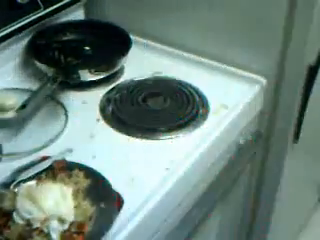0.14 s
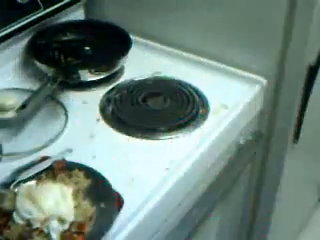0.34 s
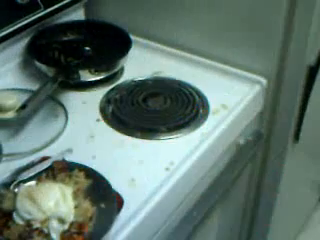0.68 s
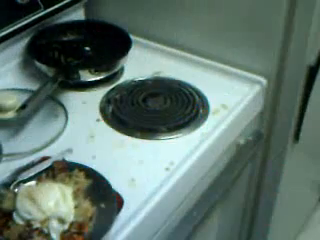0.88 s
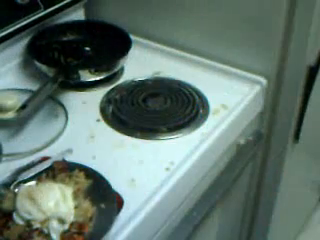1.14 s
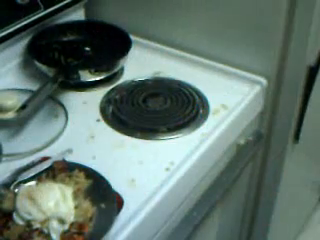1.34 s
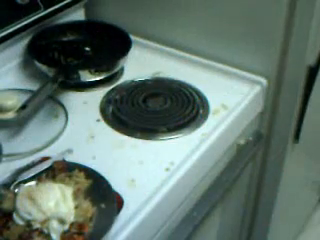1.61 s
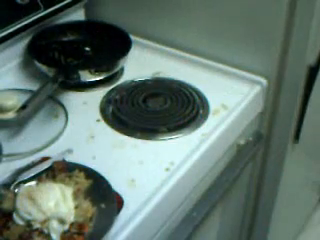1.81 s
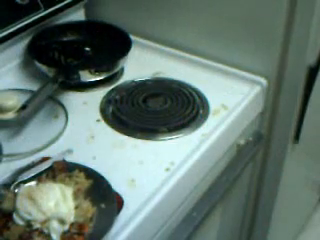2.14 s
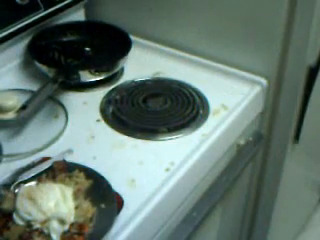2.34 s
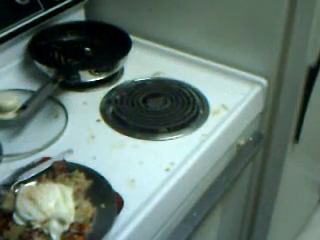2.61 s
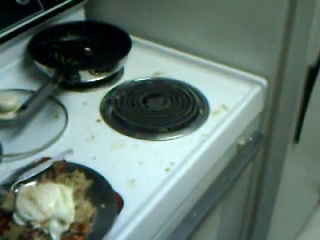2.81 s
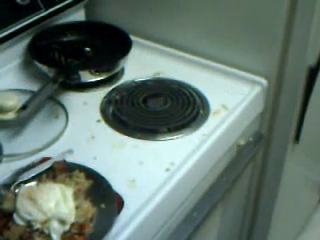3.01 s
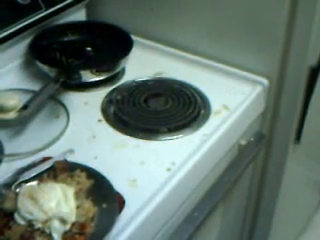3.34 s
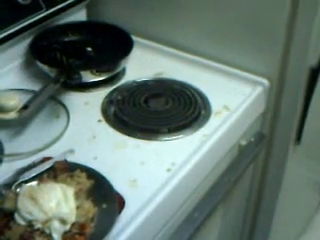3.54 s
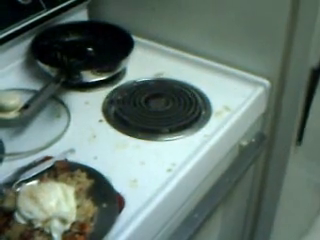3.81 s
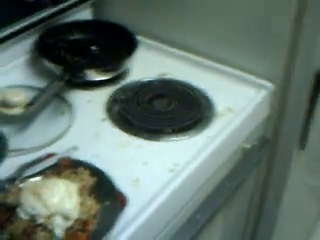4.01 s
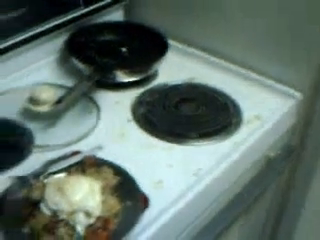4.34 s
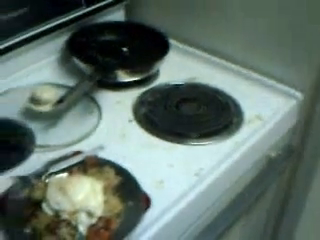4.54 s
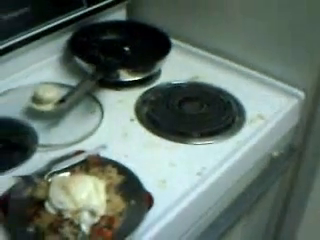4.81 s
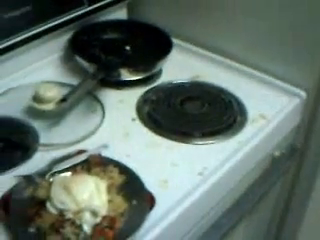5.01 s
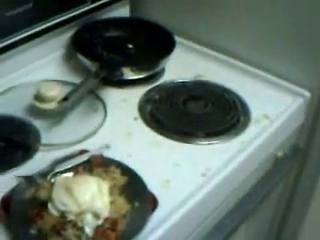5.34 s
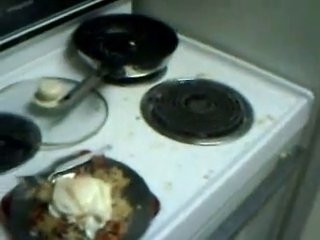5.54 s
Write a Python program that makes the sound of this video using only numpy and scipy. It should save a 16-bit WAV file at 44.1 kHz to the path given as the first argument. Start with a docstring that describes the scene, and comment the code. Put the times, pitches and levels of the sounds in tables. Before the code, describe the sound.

A steady low electric hum, slightly wavering, continues throughout over a dull, rumbling room wash with a thin, watery hiss from poor compression. A faint bump comes at about 0.3 seconds, then at 0.55 to 0.85 a utensil slides briefly with soft knocks and a thin metallic ring. At about 1.4 seconds a pan lands hard on the sheet-metal stove, by far the loudest event, slightly overloading the microphone; it bounces and rattles, with another knock near 1.57, settling by 1.8. The hum then sings out more strongly. From 1.9 to 3.4 there are only faint taps and rustles. A soft knock at 4.1 leads to a sharper clink at 4.2, small rattles, and another crisp knock at 4.55. Light taps follow, with a small knock near 4.87 and a last faint tap at 5.5. The kitchen is small and dry, with short reflections and dull treble.

```python
"""A steady electric hum in a small kitchen, over the wash of the room.
Someone slides a utensil, sets a pan down on the sheet-metal stove so that it bounces,
and knocks it twice more; faint taps lie between. Noisy contacts ring decaying metal modes, shaped
noise makes the slide and the wash, wavering sines make the hum, and a short tail adds the room.
Low-bitrate coding colours it: a top band follows each contact, and streaks thin the wash."""
import sys
import numpy as np
from scipy import signal
from scipy.io import wavfile
from scipy.ndimage import uniform_filter1d

SR = 44100
rng = np.random.default_rng(int(sys.argv[2]) if len(sys.argv) > 2 else 0)


def transcribe(u):
    """Save the signal u as a 16-bit wav file named by the first command-line argument.

    u: samples, shape (n,) or (channels, n), limited to [-1, 1]; the rate is SR.
    q: integer samples, one column per channel.
    """
    v = np.clip(np.atleast_2d(u).T, -1, 1)
    q = np.round(v * 32767).astype(np.int16)
    wavfile.write(sys.argv[1], SR, q)


N = 250481


def gain_of(db):
    """Amplitude factor of a level in dB."""
    return 10 ** (np.asarray(db) / 20)


def evened(x):
    """Scale to an rms of 1."""
    return x / np.sqrt(np.mean(x ** 2) + 1e-20)


def along(rows, t):
    """Straight-line curves through the rows, whose first column is time in seconds."""
    s, *columns = np.transpose(rows)
    return [np.interp(t, s, column) for column in columns]


def wander(t, slow_hz, fast_hz):
    """Random drift of rms 1: 24 sines of random phase, weaker towards the faster ones."""
    rates = np.geomspace(slow_hz, fast_hz, 24)
    return evened(sum(np.sin(2 * np.pi * (f * t + rng.random())) / np.sqrt(f) for f in rates))


def band(x, lo_hz, hi_hz):
    """Band-pass filter."""
    return signal.sosfilt(signal.butter(2, [lo_hz, hi_hz], "band", fs=SR, output="sos"), x)


def add(mix, s, sound):
    """Lay a sound into the mix at a time in seconds."""
    part = mix[round(s * SR):][:len(sound)]
    part += sound[:len(part)]


def registers(t, ring_tilt_db, scrape_tilt_db):
    """Decaying sines in six groups, low to high: five of stove and pan modes, then the coded top band."""
    # What stove and pan ring with below 6.2 kHz, and above it the coded top band that follows
    # each contact. Each row: frequency in Hz, relative level in dB before tilt and contact point,
    # t60 in seconds.
    contact_modes = [(93, -7, 0.11), (109, 1, 0.06), (170, -26, 0.073), (268, -15, 0.088),
                     (309.4, 17, 0.039), (378.6, -16, 0.21), (446.5, 8.5, 0.033), (535, -1, 0.065),
                     (657, 1, 0.057), (736, 6, 0.029), (839, 5, 0.057), (912, -0.5, 0.05),
                     (968, 3.5, 0.023), (1088, -2, 0.025), (1151, -6, 0.035), (1291, 1.5, 0.027),
                     (1350, -18, 0.043), (1502, -6, 0.054), (1665, -12.5, 0.041), (1835, -6, 0.094),
                     (2020, -19, 0.02), (2113, -2.5, 0.015), (2360, -3, .022), (2630, 2, 0.015),
                     (2858, -2, 0.022), (3005, -2.5, 0.025), (3305, -3, .025), (3416, -2.5, 0.0098),
                     (3715, -1, 0.013), (3917, -3, .025), (4270, 1, .008), (4460, -5, 0.0064),
                     (4950, -3.5, 0.011), (5520, -1, 0.014), (6100, -8.5, 0.0092), (6540, -2.5, 0.02),
                     (6830, -8, 0.02), (7020, -12, 0.0075)]
    hz, db, t60 = np.transpose(contact_modes)
    group = np.searchsorted([200, 420, 2050, 4100, 6200], hz)
    modes = gain_of(-60 * t / t60[:, None]) * np.sin(2 * np.pi * hz[:, None] * t)
    # only groups 2 (ring) and 3 (crunch) are tilted, in dB per octave around 1 kHz
    tilt_db = np.where(group > 2, scrape_tilt_db, ring_tilt_db) * np.log2(hz / 1000)
    tilt_db *= (group > 1) & (group < 4)
    # each contact favours other modes
    place_db = 2.5 * np.array([0, .8, .6, 1.2, 1, 1])[group] * rng.standard_normal(tilt_db.shape)
    share = gain_of(db + tilt_db + place_db)
    return [share[:, group == k] @ modes[group == k] for k in range(6)]


def blows():
    """A strike and a grainy rattle drive the lower modes; scraping noise the upper ones and coded top."""
    # Pan and utensil striking the stove. Each row: start in seconds, level in dB of the body at its
    # loudest, then thud, box, crunch, fizz and coded top band in dB against that level, rise in
    # seconds, scrape length in seconds, tilt of the ring and tilt of the crunch in dB per octave.
    stove_blows = [(.267, -46, 11, -21, -35, -26, -22, 0.0055, 0.026, -4, -5),
                   (.554, -35.5, -2, -5, -13, -37, -24, 0.0051, .045, 5, -8),
                   (.599, -38, 11, -10, -20, -30, -30, 0.0037, 0.027, -5, .1),
                   (.634, -38, 9, 0, -22, -33, -25, .004, 0.02, 1, -2),
                   (.657, -37, 7.5, 1, -21, -30, -25, 0.0035, .03, -1, 4),
                   (1.384, -11.5, -1.5, -22.5, -21, -42, -33, 0.0015, 0.0094, -5, -3),
                   (1.394, -10, 2.5, -1.5, -15, -43.5, -33, 0.00068, 0.03, 3.5, 4.5),
                   (1.423, -22.5, -8.5, 3.5, -22, -27.5, -30.5, 0.0024, 0.038, -2.5, 5.5),
                   (1.439, -28, 11.5, -22.5, -28, -32.5, -32, 0.0043, 0.029, -2.5, 1),
                   (1.461, -26, 3, -4.5, -14.5, -37, -33, 0.0063, 0.028, 0.5, -1),
                   (1.5, -31.5, 2, 1, -25, -30, -34, 0.005, 0.036, -6.5, 1),
                   (1.57, -17.5, -25, -7.5, -22, -37, -39.5, 0.0028, 0.02, -6.5, 8),
                   (1.581, -23, 3.5, -8, -21.5, -34, -36, 0.0023, 0.041, -2, 4),
                   (1.617, -31, -9.5, 1, -14, -40, -28.5, 0.0043, 0.068, -1.5, -1.5),
                   (1.674, -25, -0.5, -19, -17.5, -43, -35, 0.0032, 0.039, -3.5, 0),
                   (1.692, -33.5, 7.5, -10.5, -12, -32.5, -26, 0.0045, .022, 10, 1.5),
                   (1.739, -31, 7.5, -0.5, -18.5, -34, -31, 0.016, 0.05, -1.5, .1),
                   (4.082, -33, -14, 3, -21, -33, -42, 0.0093, 0.033, -1.5, -6),
                   (4.201, -43, -18, -11, 4, -10, -3.5, 0.0062, 0.02, 6, -0.5),
                   (4.214, -29, -10.5, -8, -4, 3, -2, 0.0058, 0.027, 4, 8),
                   (4.224, -14.5, -24, -.5, -5.5, -16.5, -13, 0.0021, 0.011, 5, 14),
                   (4.258, -33.5, -15, 9.5, -24.5, -29, -21, 0.0044, 0.051, 1, 2),
                   (4.304, -27, -9.5, -2.5, -30, -32, -32, 0.018, 0.029, 8, 1),
                   (4.33, -28.5, -20, 1, -13.5, -32, -29, 0.0031, 0.034, -3, 14),
                   (4.347, -36.5, -16.5, 7, -11, -27.5, -25, .005, 0.022, -7, 15),
                   (4.447, -32.5, -26, -8, -16.5, -37, -29, 0.01, 0.022, 2, -5),
                   (4.471, -33.5, -23, -7, -14, -37, -26, .004, 0.025, -4, 7),
                   (4.506, -49, -17, -7, -8, -8, -5, 0.004, 0.045, -1, .1),
                   (4.518, -40, -19, -3, -2.5, -3.5, -14, 0.0015, .008, 1.5, 15),
                   (4.537, -37, -21.5, -8, -11, -10, -9, .006, .016, 12, 6),
                   (4.551, -17, -43, -7.5, -12, -23, -28, 0.0018, 0.014, 12, -13),
                   (4.56, -19.5, -31, 5.5, -24.5, -16.5, -26, 0.0034, 0.018, -1, 1.5),
                   (4.582, -28, -9, -3.5, -11.5, -9.5, -20, 0.0017, 0.016, 7.5, -7),
                   (4.596, -33, -12, 9, -7, -16, -27, 0.0054, 0.018, -5.5, 3),
                   (4.612, -36, -2.5, -0.5, -9.5, -24, -24, 0.0056, 0.018, 3, -1),
                   (4.867, -29, -14, -2, -23.5, -41, -39, 0.0017, 0.01, 5, -5)]
    # Faint taps and rustles. Each row: start in seconds, level in dB of the body at its loudest,
    # crunch in dB against that level, scrape length in seconds.
    faint_taps = [(.398, -40, -11.5, 0.042), (.981, -42.5, -15, 0.025), (1.91, -39.5, -12, 0.063),
                  (1.939, -39.5, -17, 0.025), (2.099, -42, -15, 0.028), (2.159, -42.5, -12, 0.024),
                  (2.487, -38, -14.5, 0.027), (2.611, -41, -12, 0.04), (2.803, -40, -15.5, 0.046),
                  (2.892, -35.5, -20, 0.053), (2.971, -37, -26, 0.028), (2.994, -40.5, -13, 0.032),
                  (3.37, -46, -7.5, 0.05), (4.389, -35.5, -25, 0.025), (4.63, -44, -19.5, .03),
                  (4.712, -34, -24, 0.022), (4.732, -35, -20, 0.036), (4.746, -42.5, -10, 0.033),
                  (4.82, -41, -14, 0.047), (5.494, -38.5, -19, 0.035)]
    # shared by the taps: layers in dB against the body, rise in s, both tilts in dB per octave
    tap_thud_db, tap_box_db, tap_fizz_db, tap_coded_top_db = -10.5, -8, -40.5, -26.5
    tap_rise_s, tap_tilt_db = 0.0088, -0.5
    strike = 1.2  # first contact against the rattle, at a rise of strike_rise_s
    strike_rise_s = 0.0014  # a slower contact loses its first strike
    rattle_t60_s, scrape_t60_s = 0.079, 1
    grain_db = 3.2  # unevenness of the contact

    contacts = [*stove_blows]
    for at, db, crunch, length in faint_taps:
        contacts.append((at, db, tap_thud_db, tap_box_db, crunch, tap_fizz_db, tap_coded_top_db,
                         tap_rise_s, length, tap_tilt_db, tap_tilt_db))
    columns = np.transpose(contacts)[:, :, None]
    s, level_db, thud_db, box_db, crunch_db, fizz_db, coded_top_db, rise, scrape, *tilts = columns

    t = np.arange(7000) / SR
    start = 1 - np.exp(-(t / rise) ** 2)
    held = np.exp(-(t / scrape) ** 6)  # lasts while the faces touch, then stops
    rattle_noise, rub_noise, rough = rng.standard_normal((3, len(s), len(t)))
    grain = start * gain_of(grain_db * evened(uniform_filter1d(rough, 130)))

    push = t[None] * np.exp(-t / 0.0013)  # the whole weight lands once and moves the large panels
    rattle_level = grain * held * gain_of(-60 * t / rattle_t60_s)
    strike_level = strike * np.exp(-t / 0.0028) * (strike_rise_s / rise) ** 3
    rattle = rattle_noise * (rattle_level + strike_level)
    rub = rub_noise * np.sqrt(start * grain) * held * gain_of(-60 * t / scrape_t60_s)

    drives = [push, rattle, rattle, rub, rub, rub]
    thud, box, body, crunch, fizz, coded_top = (
        signal.fftconvolve(drive, ring, axes=1)[:, :len(t)]
        for drive, ring in zip(drives, registers(t, *tilts)))
    parts = [(thud_db, band(thud, 75, 320)),
             (box_db, box),
             (0, band(body, 326, 1900)),
             (crunch_db, band(band(crunch, 1800, 4100), 1800, 4100)),
             (fizz_db, band(band(fizz, 4000, 6700), 4000, 6700)),
             (coded_top_db, band(band(coded_top, 6120, 8470), 6120, 8470))]
    sounds = 0
    for db, part in parts:
        loudest = uniform_filter1d(part ** 2, 400).max(axis=1, keepdims=True)  # power over 9 ms
        sounds = sounds + gain_of(level_db + db) * part / np.sqrt(2 * loudest)
    out = np.zeros(N)
    for at, sound in zip(s[:, 0], sounds):
        add(out, at, sound)
    return out


def slide():
    """Rubbing noise shakes the panels and rings the utensil; returns the start in s and the sound."""
    # The course of the slide. Each row: time in seconds, then the levels of rumble, rubbing
    # and ringing in dB.
    slide_course = [(0.55, -43, -18, -61), (0.568, -50, -45, -65), (0.592, -46, -49, -59),
                    (0.616, -35, -43.5, -65), (0.664, -37, -35, -43), (0.726, -51, -46, -42),
                    (0.784, -44, -51.5, -62), (0.85, -48, -48, -75)]
    # What the utensil rings with. Each row: centre in Hz, width in Hz, relative level in dB.
    ring_bands = [(2290, 200, 0), (2950, 1300, -9), (3960, 170, -4), (4500, 1100, -10), (6900, 800, -7)]
    t = np.arange(slide_course[0][0], slide_course[-1][0], 1 / SR)
    rumble_db, rub_db, ring_db = along(slide_course, t)
    rumble_noise, rub_noise, ring_noise, rough = rng.standard_normal((4, len(t)))
    grain = gain_of(1.5 * evened(uniform_filter1d(rough, 300)))  # the contact catches and slips
    ring = sum(gain_of(db) * evened(band(ring_noise, hz - width / 2, hz + width / 2))
               for hz, width, db in ring_bands)
    rumble = gain_of(rumble_db) * evened(band(rumble_noise, 47, 107))
    rub = gain_of(rub_db) * evened(band(rub_noise, 325, 1020))
    ringing = gain_of(ring_db) * evened(ring) * grain
    return t[0], (rumble + rub + ringing) * signal.windows.tukey(len(t), .15)


def hum():
    """Partials of one steady fundamental, the sixth singing out, and a drifting tone beside them."""
    # Weaker partials. Each row: multiple of the fundamental, level in dB, wavering in dB
    # (rms; its sign only turns the random drift over).
    weaker_partials = [(1, -57, 6), (2, -60.5, 1.5), (5, -61.5, -5), (7, -58, 3)]
    # The sixth partial sings out once the pan has landed, and more so later.
    # Each row: time in seconds, level in dB.
    sixth_course = [(0, -49.5), (.5, -57.5), (1.35, -52), (1.6, -43), (2.9, -44), (3.3, -41), (5.68, -41)]
    # A wandering tone beside the fourth partial. Each row: time in seconds, frequency in Hz, level in dB.
    drifting_course = [(0, 233.8, -51.5), (2.28, 232.8, -50), (2.38, 237.6, -42), (2.52, 236.7, -46),
                       (2.62, 236.9, -49.5), (2.75, 238.3, -45.5), (2.87, 237.6, -46.5),
                       (2.95, 232.2, -49.5), (4.05, 233.6, -53.5), (4.2, 236, -51), (4.45, 231.3, -50.5),
                       (5.68, 233.3, -50.5)]
    hum_hz = 58.82  # fundamental
    octave_db = -9  # octave of the drifting tone, against the tone
    t = np.arange(N) / SR
    steady = np.zeros(N)
    for multiple, db, waver_db in [*weaker_partials, (6, *along(sixth_course, t), 0.33)]:
        level = gain_of(db + waver_db * wander(t, 0.585, 22))
        steady += level * np.sin(2 * np.pi * (round(multiple) * hum_hz * t + rng.random()))
    hz, db = along(drifting_course, t)
    turn = 2 * np.pi * np.cumsum(hz) / SR
    tone = np.sin(turn) + gain_of(octave_db) * np.sin(2 * turn)
    drifting = gain_of(db + 2.2 * wander(t, 0.591, 23)) * tone
    return np.sqrt(2) * (steady + drifting)  # the levels are rms


def kitchen(x):
    """Room reflections as decaying noise: a short diffuse tail, duller than the direct sound."""
    t = np.arange(SR // 2) / SR
    tail = rng.standard_normal(len(t)) * gain_of(-60 * t / 0.21) * (t > .006)  # t60 0.21 s, after 6 ms
    tail = band(tail, 97, 2700)
    return signal.fftconvolve(x, tail / np.linalg.norm(tail))[:N]


def wash():
    """Random short-time spectra with drifting patches, coding streaks and a flicker shared by all bands."""
    # Colour of the room wash. Each row: frequency in Hz, relative spectral level in dB.
    wash_colour = [(12, -61.5), (20, -4.5), (107, -12.5), (151, -20), (224, -10), (294, -9.5), (349, -9),
                   (405, -13), (1140, -15), (1820, -27.5), (2170, -34), (2390, -32), (3630, -34.5),
                   (5390, -39.5), (7250, -38.5), (9420, -79), (16000, -120)]
    # Bands that stand out from it or dip. Each row: centre in Hz, width in Hz, change in dB.
    wash_bands = [(106.4, 8, 9), (190, 75, 7), (677, 58, 4), (5350, 190, 12.5), (6110, 920, -6)]
    wash_db, flicker_db = -43, .9  # rms of the whole wash; rms of the flicker
    # low-bitrate coding leaves thin, mostly downward streaks in the upper middle;
    # rises stop at streak_top_db
    streak_hz, streak_width_hz, streak_db, streak_top_db = 2940, 1400, 7.5, 4.5
    frames, hz = N // 512 + 5, np.fft.rfftfreq(2048, 1 / SR)
    real, imaginary, patches, streaks = rng.standard_normal((frames, 1025, 4)).T
    streaks = evened(uniform_filter1d(uniform_filter1d(streaks, 3, 0), 9, 1))
    streaks *= streak_db * np.exp(-((hz[:, None] - streak_hz) / streak_width_hz) ** 4)
    patches = evened(uniform_filter1d(uniform_filter1d(patches, 8, 0), 4, 1))
    patches *= 2.3 * np.where(hz < 4100, 1, .55)[:, None]  # dB, calmer in the treble
    t = np.arange(frames) * 512 / SR
    f, db = np.transpose(wash_colour)
    colour_db = np.interp(np.log(hz + 1), np.log(f), db)
    colour_db += sum(d / (1 + (2 * (hz - c) / w) ** 2) for c, w, d in wash_bands)
    flicker = flicker_db * wander(t, 2.5, 14)
    level_db = colour_db[:, None] + patches + np.minimum(streaks, streak_top_db) + flicker
    spectra = (real + 1j * imaginary) * gain_of(level_db)
    noise = signal.istft(spectra, nperseg=2048, noverlap=1536)[1][:N]
    return gain_of(wash_db) * evened(noise)


def scene():
    """Blows and slide with their room tail, over hum and wash."""
    near = blows()
    add(near, *slide())
    return (near + gain_of(-13.5) * kitchen(near) + hum() + wash())[None]


def record(dry):
    """Clipping; then the response drops by a step just below the band limit."""
    step_hz, limit_hz, step_db = 7320, 7736, -16
    below, limit = (signal.firwin(511, hz, window=("kaiser", 9), fs=SR) for hz in (step_hz, limit_hz))
    squeezed = np.clip(dry, -.7, .7)  # the heaviest blow just overloads the input
    response = below + gain_of(step_db) * (limit - below)
    return signal.oaconvolve(squeezed, response[None], "same")


dry = scene()
out = record(dry)
transcribe(out)
```